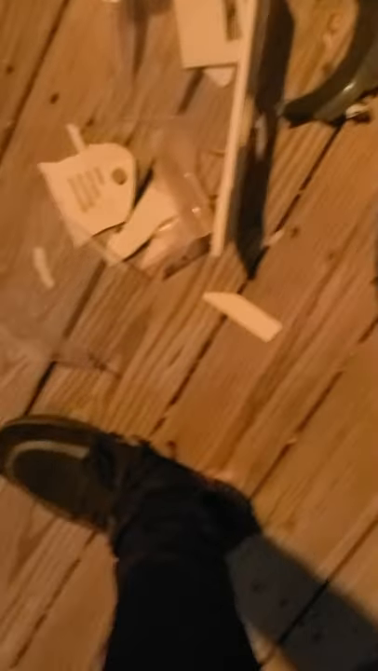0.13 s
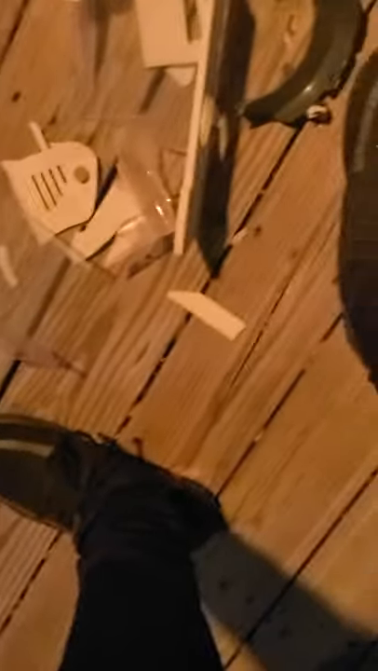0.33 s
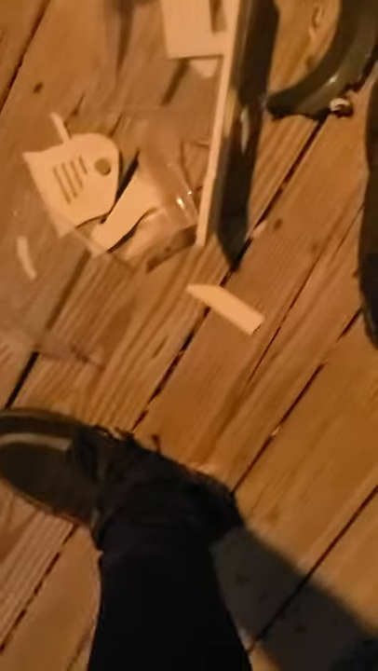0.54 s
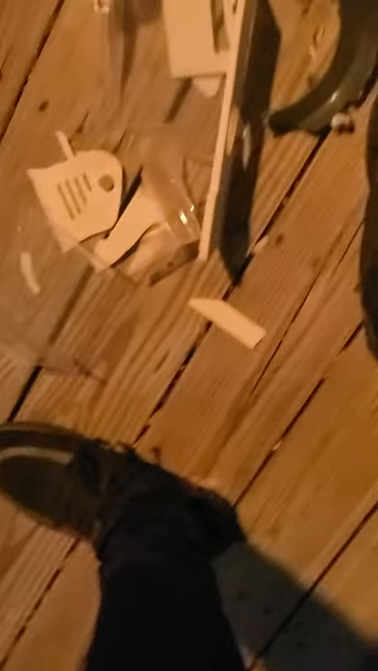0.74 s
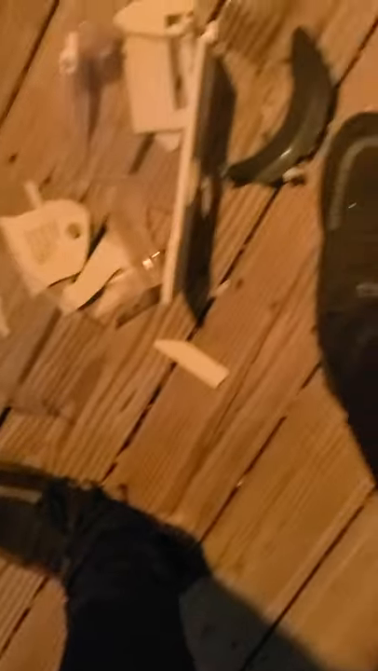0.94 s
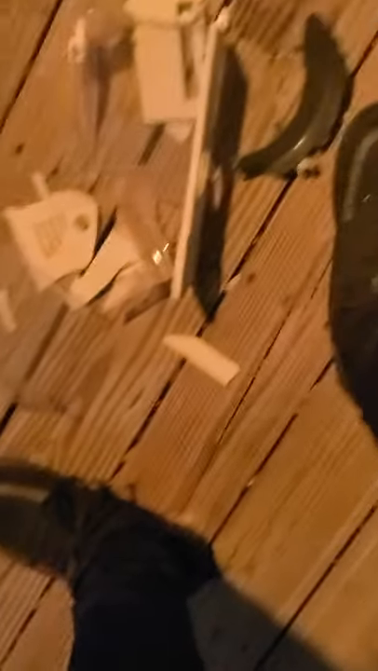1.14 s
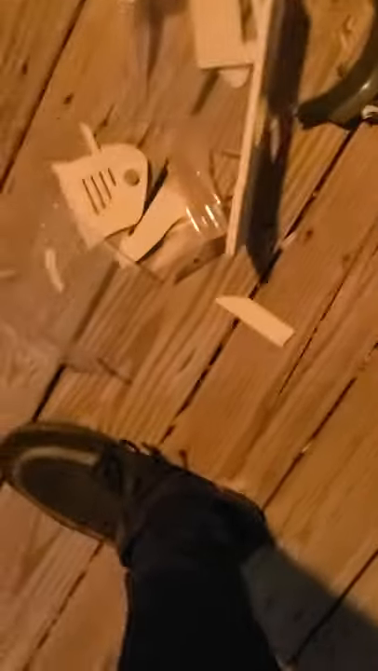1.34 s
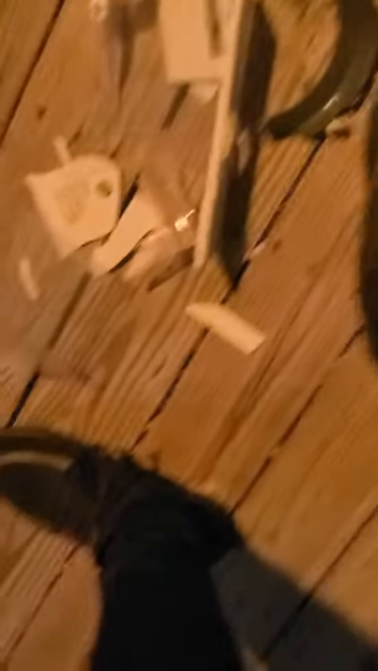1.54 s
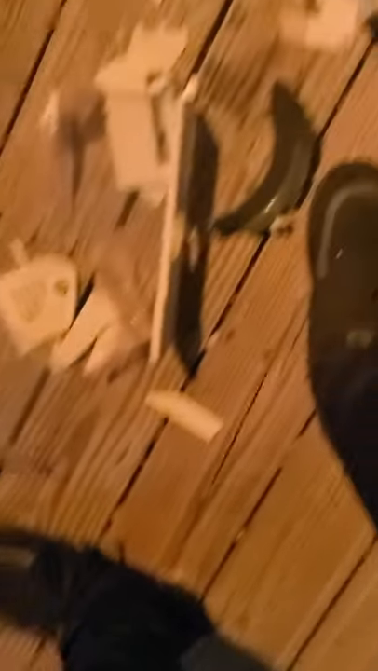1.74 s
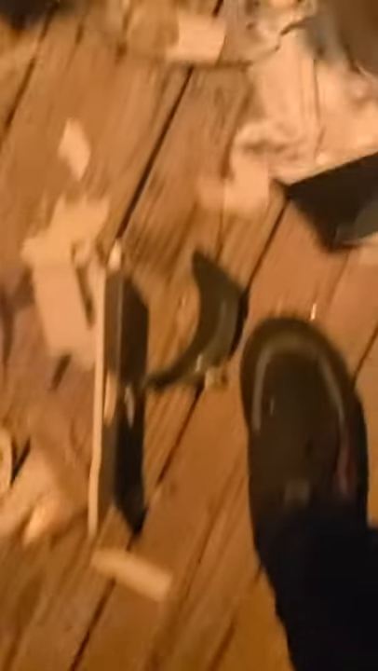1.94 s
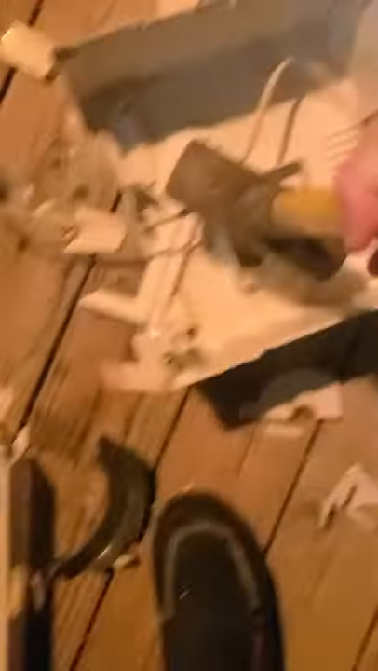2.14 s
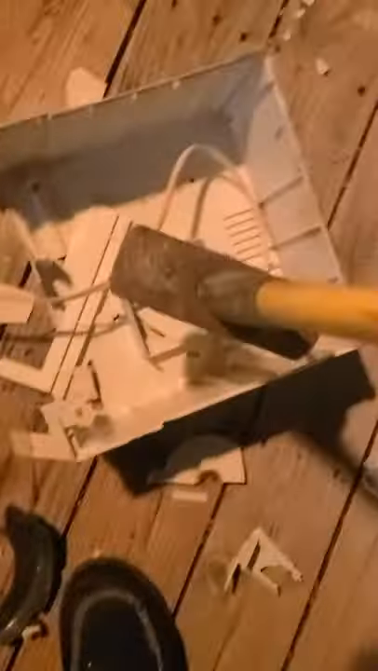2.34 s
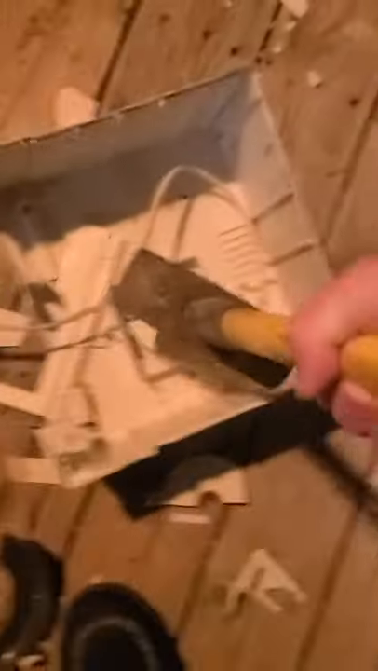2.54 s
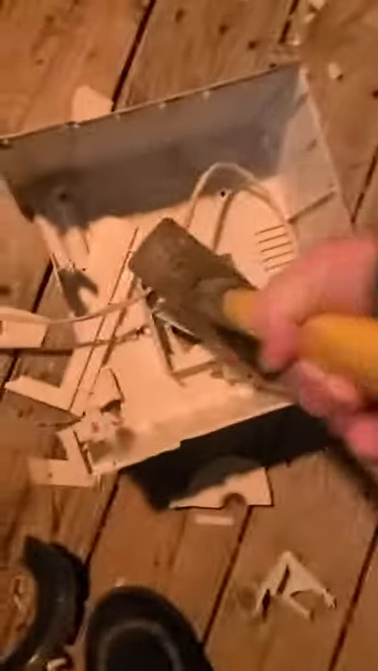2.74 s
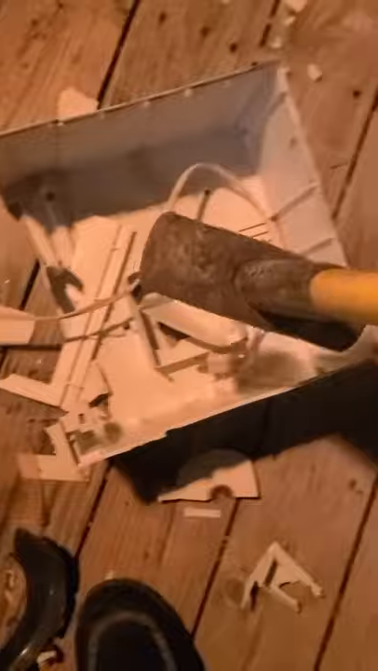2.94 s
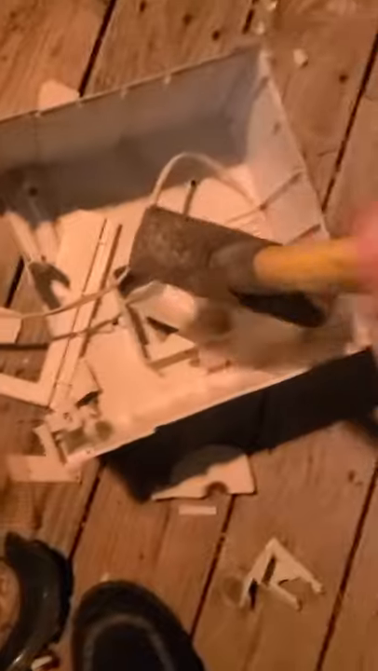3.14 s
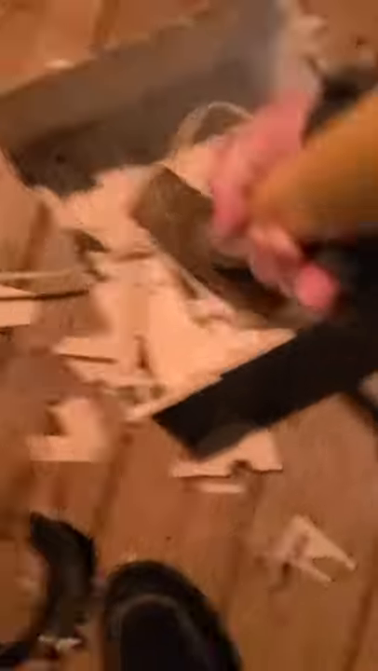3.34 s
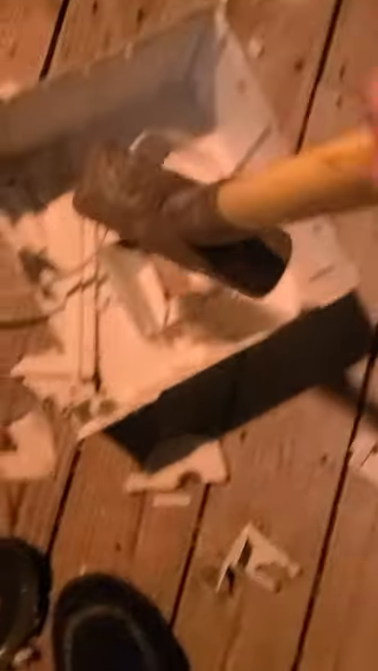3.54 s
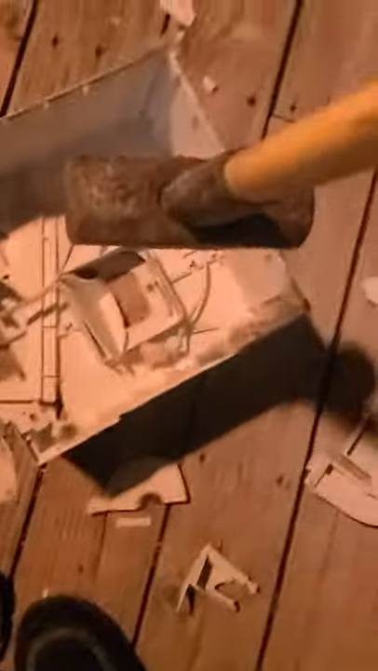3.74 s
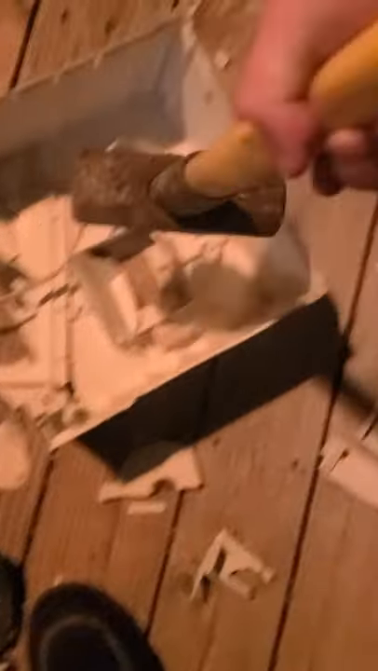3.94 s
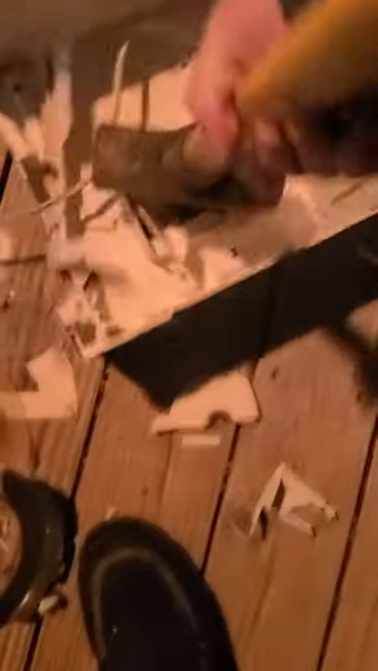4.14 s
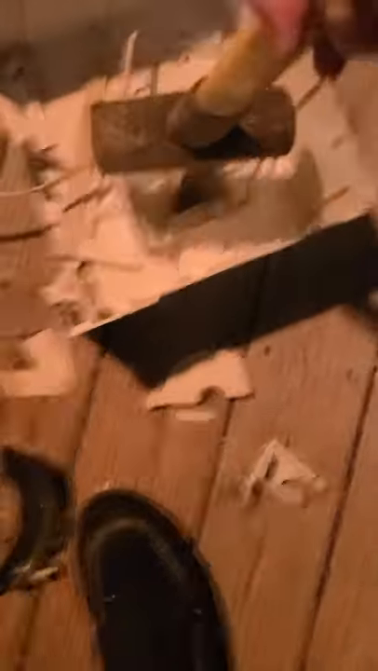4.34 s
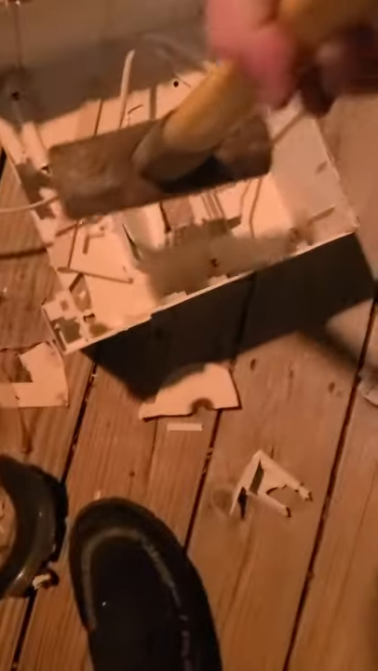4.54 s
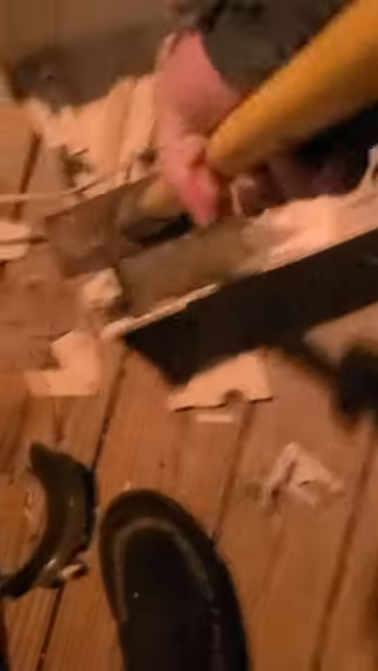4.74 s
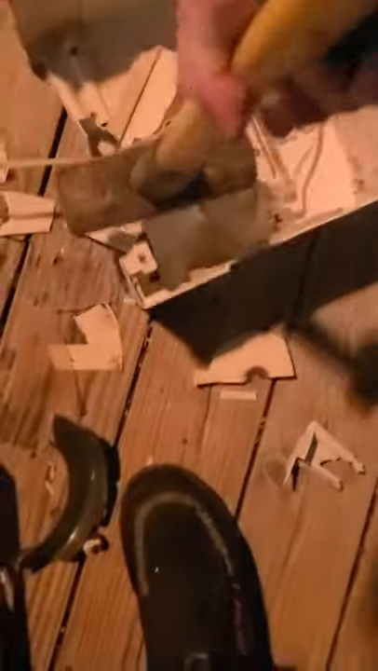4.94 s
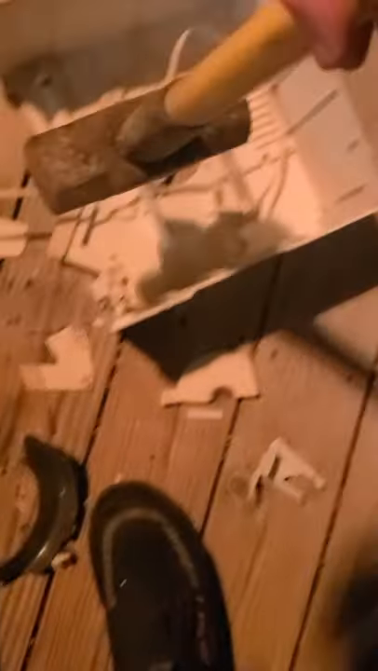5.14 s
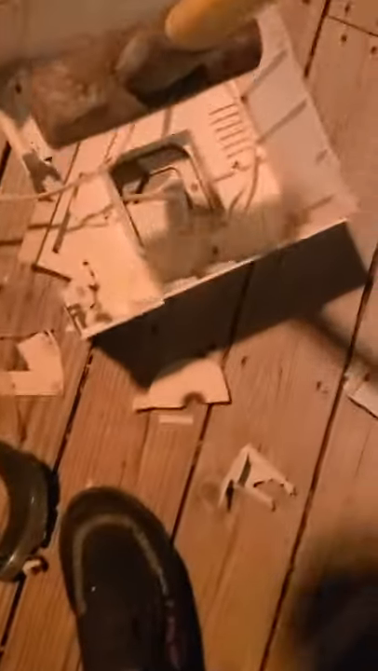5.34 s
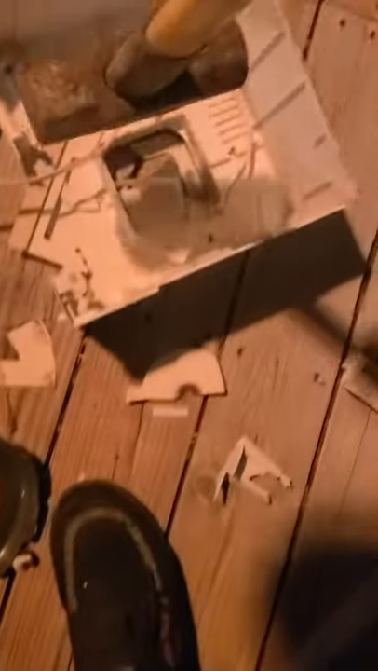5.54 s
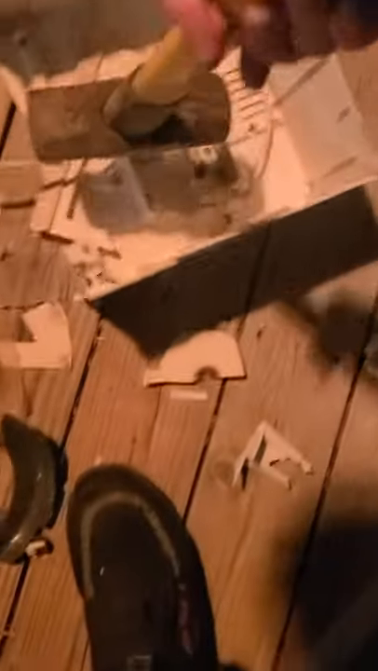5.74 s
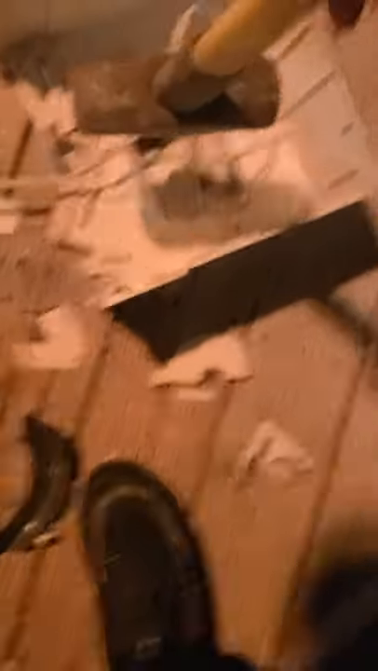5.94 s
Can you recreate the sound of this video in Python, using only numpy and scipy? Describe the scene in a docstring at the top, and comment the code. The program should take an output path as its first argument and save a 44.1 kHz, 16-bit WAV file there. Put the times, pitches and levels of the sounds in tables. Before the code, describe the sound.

Outdoors on a wooden deck, close and dry in stereo, with a very faint low distant rumble. At 0 s a muted thud and small plastic knocks, then light ticks to 0.4 s. At 0.46 s the first heavy hammer blow: bright crack, splinters, hollow boom and deep deck thump, shards rattling away. Small knocks near 0.87 s. A boxier, lighter-bottomed hit comes at 1.28 s with a second crack at 1.36; a harsh crunch follows at 1.97 s, and a crisp hit at 2.61 s. At 3.23 s a loud crack shakes the boards, settling to near quiet. At 4.07 s a very heavy blow bounces with low thuds; at 4.72 s another breaks into a dense cluster of cracks and crunching until about 5.1. After a lull, 5.68 s brings a last hard smash, double low thump and brief debris clatter, fading by 6 s.

```python
"""A sledgehammer batters a broken plastic housing on a wooden deck, outdoors, over a low distant rumble.
From 0 s: a thud and light knocks; then main blows near 0.46, 1.28, 1.97, 2.61, 3.23, 4.07, 4.72 and 5.68 s.
At each blow: noise swells, ringing cracks and ticking splinters, decaying sines for the hollow box and deck.
After each blow: noise-driven modes drum and shake, random grains clatter and grind, then come to rest.
Two microphone ports a little apart hear the housing with reflections and a small lag on the right."""
import sys
import numpy as np
from scipy import signal
from scipy.fft import rfft, irfft, next_fast_len
from scipy.io import wavfile
from scipy.ndimage import uniform_filter1d, map_coordinates

SR = 44100
rng = np.random.default_rng(int(sys.argv[2]) if len(sys.argv) > 2 else 0)


def digitize_waveform(pressure):
    """Quantize a signal to 16-bit integers and store it at the path in sys.argv[1].

    Rows of a 2-D input are taken as channels; values are limited to [-1, 1].
    """
    field = np.atleast_2d(pressure).T
    bounded = np.clip(field, -1, 1)
    quanta = np.round(bounded * 32767).astype(np.int16)
    wavfile.write(sys.argv[1], SR, quanta)


def gain_from_db(level_db):
    """Turn a decibel level (scalar or array-like) into a linear amplitude factor."""
    decades = np.asarray(level_db, float) / 20
    return 10 ** decades


N = 268110

# distant background spectrum: hz, relative level_db (per Hz)
RUMBLE_SPECTRUM = [(15, -42), (25, -21.5), (64, 4.5), (175, -10), (200, -15), (270, -9), (326, -18.5),
                   (1940, -37.5), (2350, -43.5), (5570, -54), (8140, -55.5), (16000, -58)]
# left-right correlation of the background: hz, likeness (-1 to 1)
RUMBLE_LIKENESS = [(60, 1), (240, 1), (950, 0.015), (3770, 0.55), (15000, -0.05)]
RUMBLE_RMS_DB = -48
# faint hiss that comes and goes: start_s, level_db
HISS_LEVEL = [(0, -63), (.8, -82), (1.1, -78), (1.6, -81), (1.9, -70), (2.4, -80), (2.6, -67.5),
              (2.95, -93.5), (3.7, -71.5), (3.8, -94.5), (4.05, -90), (4.5, -71.5), (5.2, -70), (5.65, -75),
              (5.8, -81.5), (6.08, -99)]
# narrow bands in the hiss: band_hz, relative level_db
HISS_BANDS = [(3180, -1.5), (3880, -6.5), (4730, 0), (6130, -6.5), (8130, -4), (9900, -3), (11500, -4.5),
              (13000, -3)]
HISS_BAND_T60_S, HISS_BANDS_RE_HISS_DB = .012, -2

# deck board modes, long span: mode_hz, relative level_db, t60_s
LONG_BOARDS = [(50, -8, 0.27), (69.4, 1, 0.21), (77.54, -7, 0.72)]
# deck board modes, short span: mode_hz, relative level_db, t60_s
SHORT_BOARDS = [(100.4, -6, 0.27), (118.3, -2.5, 0.17), (169, -2.5, 0.21), (204, -7, 0.29)]
# shaking of the deck by each blow: start_s, long_boards_db, long_boards_t60_s, short_boards_db
SHAKES = [(0, -30.5, 1, -36.5), (.46, -20, 1.12, -18), (.868, -46.5, 2, -57), (1.277, -36, 1.1, -26),
          (1.972, -26, 1.27, -24.5), (2.611, -33, 0.88, -30.5), (3.225, -20.5, 1.18, -15),
          (4.069, -17, 1.44, -16.5), (4.716, -19.5, 1.24, -17.5), (5.68, -17.5, 0.84, -24)]
LONG_RISE_S, SHORT_RISE_S, SHORT_T60_S = .022, 0.014, 0.66
# head landing and bouncing on the boards through the housing: start_s, relative level_db, board_hz, t60_s
THUDS = [(0.0, -8.5, 62, 0.074), (0.481, -10, 96.9, 0.14), (0.518, -4, 102, 0.14), (.565, -12, 68, 0.13),
         (.66, -16, 71.9, 0.33), (1.271, -12.5, 171, 0.11), (1.355, -21.5, 75, 0.36),
         (1.762, -26.5, 78, 0.18), (1.985, -13, 254, 0.1), (2.071, -16, 83, 0.19), (2.148, -18, 81, 0.12),
         (2.607, -21.5, 264.5, 0.12), (2.696, -17, 83, 0.16), (2.809, -21, 79, 0.12),
         (3.224, -13.5, 220.6, 0.2), (3.252, -10, 98, 0.13), (3.29, -5.5, 111.1, 0.25),
         (3.448, -14, 70.2, 0.24), (4.097, -1.5, 88, 0.13), (4.151, 3, 107.5, 0.084),
         (4.248, -13.5, 75.3, 0.28), (4.735, -9.5, 85, 0.16), (4.821, -9, 69, 0.14), (5.679, -4, 88.5, 0.1),
         (5.759, 2.5, 77, 0.04), (5.874, -17, 72, 0.2)]

# air modes of the hollow box: mode_hz, relative level_db, t60_s
BOX_MODES = [(245, -3.5, 0.049), (328, -4, 0.05), (371.4, -2.5, .1), (422, -2.5, 0.043), (487.8, -5, 0.053),
             (542, -9.5, 0.048)]
# strikes on the hollow box: start_s, relative level_db, pitch_hz
BOOMS = [(0.035, -33, 370), (0.172, -28, 372), (0.329, -33, 370), (0.449, -21, 423), (0.463, -13, 480),
         (0.49, -9.5, 456), (0.519, -19, 422), (0.62, -37, 318), (0.707, -40, 390), (0.874, -23, 383),
         (1.007, -34, 362), (1.274, -8, 354), (1.285, -5, 382.5), (1.364, -10.5, 350), (1.456, -31.5, 377),
         (1.545, -32.5, 380), (1.971, -12, 375), (1.984, -13, 376), (2.018, -8.5, 534), (2.067, -16, 397),
         (2.106, -24, 365), (2.142, -25, 440), (2.244, -71, 373), (2.612, -9, 257.7), (2.683, -19.5, 424),
         (3.225, -17, 617), (3.25, -14.5, 257), (4.064, -13.5, 393), (4.109, -11.5, 547),
         (4.168, -13.5, 394), (4.201, -11.5, 363), (4.276, -18, 382), (4.374, -34, 355), (4.714, -26, 506),
         (4.723, -6, 356), (4.794, -8.5, 336), (4.848, -6.5, 379.3), (4.879, -9.5, 366), (4.927, -12, 346),
         (5.017, -26, 328), (5.063, -28.5, 396), (5.686, -12, 360), (5.696, -11.5, 420), (5.803, -44, 330),
         (5.87, -36, 354)]
BOX_LAG_S = 0.00026   # the open side of the box faces away from the right port
DRUM_RE_BOOM_DB, DRUM_T60_S = -18, 0.35

# blows and shoves that throw the heap about:
# start_s, heap_db, t60_s (scaled in heap), still_after_s, grinding_re_heap_db
BLOWS = [(0, -36.5, 0.53, 0.11, -31), (.165, -48.5, 0.95, 0.078, -16), (.31, -51, 2.2, .13, -13),
         (0.449, -28.5, 0.79, .33, -12.5), (.864, -45.5, 0.91, 0.27, -21), (1.274, -32, 1.31, 0.26, -9.5),
         (1.968, -24.5, 0.83, .31, -8.5), (2.611, -31, 0.65, 0.26, -6), (3.227, -25.5, 0.61, 0.4, -11),
         (4.068, -23, 0.78, 0.46, -9), (4.718, -27, 1.04, 0.49, -10.5), (5.678, -25, 0.5, 0.48, -15)]
CLATTER_LINGERS, ROCK_LINGERS = 0.87, 1.006   # shares of the heap's t60_s
ROCK_RE_HEAP_DB = 2
STILL_T60_S = 0.27   # extra decay once the shards come to rest
LEAD_IN_RE_HEAP_DB, LEAD_IN_DB_PER_S = -6, 1498.5   # a quick swell of noise up to each blow
CLATTER_RE_CRACK_DB, CLATTER_T60_S = -14, 0.078
CRUNCH_RE_SPLINTER_DB, CRUNCH_T60_S = -10.5, 0.057
SWELL_RE_EVENT_DB, SWELL_T60_S = -26.5, 0.04   # a brief swell of noise before each crack or splinter

# colour of splintering plastic: hz, relative level_db (per Hz)
SNAP_SPECTRUM = [(2060, -27.5), (3500, 1), (3860, -8), (4780, -2), (8020, -7), (8950, -4), (14700, -9),
                 (16000, -20.5), (16500, -31.5)]
# plastic splintering and chips landing: start_s, relative level_db, pitch_hz, left_re_right_db
SPLINTERS = [(0.0034, -20.5, 8900, 1.5), (0.0233, -16, 5000, -2), (0.0686, -33, 4490, 1.0),
             (0.2179, -47.5, 4690, 11), (0.3097, -47.5, 4780, 1.0), (0.3311, -34, 5420, -7),
             (0.366, -44, 5330, 4), (0.413, -50.5, 4500, 2), (0.4457, -24.5, 7420, -5),
             (0.4563, -17, 9400, 4), (0.466, -4.5, 8980, 6.5), (0.475, -11.5, 8910, 3),
             (0.4874, -11.5, 7220, 3), (0.5383, -32.5, 4640, -9), (0.5881, -21, 4800, -4),
             (0.609, -40.5, 5030, 3), (0.6567, -29.5, 10500, 6), (0.6744, -34, 9000, 3),
             (0.7118, -37, 5600, 9), (0.7592, -43, 5350, -2), (0.8612, -64, 5230, 3.5),
             (0.8708, -32.5, 8500, -1.0), (0.9033, -45, 5130, 4), (0.9467, -58, 4910, 1.0),
             (0.9586, -55, 7000, 7), (0.9775, -60, 4550, 0.0), (0.9934, -50, 6790, 3.5),
             (1.0006, -34.5, 5370, 16), (1.051, -49, 4530, -8), (1.279, -7, 5230, 4.5),
             (1.2839, -15, 5330, 4), (1.3421, -29.5, 4700, -2), (1.3543, -25.5, 5560, 4.5),
             (1.362, -17, 7800, 5), (1.3657, -21.5, 4860, -1.0), (1.3884, -27.5, 5700, -10),
             (1.4349, -29, 5030, -5), (1.4588, -32, 5260, -1), (1.9718, -18, 5330, 10.5),
             (1.9825, -10, 6000, 4.5), (2.0005, -4, 5310, -1.5), (2.0195, -19.5, 7060, 11),
             (2.0714, -38, 4400, 4), (2.1011, -36, 7450, -2.5), (2.1246, -34.5, 6800, -6.5),
             (2.151, -17.5, 4540, 1.5), (2.1705, -28.5, 6500, 0), (2.2515, -45.5, 6000, 24),
             (2.2734, -35, 10100, 1.5), (2.3504, -40.5, 8440, -8.5), (2.6128, -7, 4660, 3),
             (2.6186, -10.5, 4600, 3.5), (2.6258, -9, 5030, 2.5), (2.6518, -19.5, 11800, 2),
             (2.703, -26, 6430, 3), (2.7636, -38.5, 4660, -13), (2.7885, -37, 4420, 0.5),
             (2.8227, -37, 6960, 11), (2.8539, -49, 5980, 3), (2.9064, -57.5, 4380, 2),
             (2.9354, -59, 4620, -0.5), (3.2271, -15, 5010, 5), (3.244, -7.5, 6820, 6),
             (3.2566, -5.5, 4940, -2.5), (3.3287, -31, 7640, -11), (3.3618, -32, 4700, 17),
             (3.3867, -68, 5190, 20), (3.4146, -58, 4960, 1.5), (3.4429, -48, 4980, 0.0),
             (3.4552, -47, 5300, 10), (3.4855, -53, 5760, 1.0), (3.5324, -49, 5660, 0.5),
             (3.6644, -58, 6550, 1), (4.0677, -30, 4730, -6), (4.1024, -12.5, 6100, -6),
             (4.1154, -13, 5900, 11), (4.1634, -26.5, 6300, 6), (4.2084, -35.5, 5530, 8.5),
             (4.2694, -14.5, 10500, 9), (4.3421, -40, 4520, 12), (4.377, -32, 5300, 4),
             (4.419, -41, 5160, 9), (4.4424, -40, 5260, 10), (4.454, -50.5, 4800, 5),
             (4.7163, -18, 9400, 7.5), (4.7259, -16.5, 5400, -6), (4.7352, -14, 9500, 6),
             (4.7819, -15, 6000, -5.5), (4.7952, -18.5, 5340, -4), (4.804, -8, 11900, 5.5),
             (4.8274, -8.5, 5850, 3), (4.8494, -14.5, 6240, 4.5), (4.8654, -28, 5800, -0.5),
             (4.8877, -24, 4970, 5.5), (4.9089, -30, 9400, 1.5), (4.9184, -28.5, 11900, -1),
             (4.94, -27, 7600, 5), (4.9504, -32.5, 7800, 0.5), (4.9856, -34, 4950, 7),
             (5.001, -23.5, 5180, 13), (5.035, -30.5, 4770, 1.0), (5.055, -62, 5270, 14),
             (5.0917, -30.5, 9300, 14), (5.1206, -41, 5260, 4), (5.1522, -46, 11550, 5),
             (5.673, -20, 5460, -1), (5.685, -7, 6300, 4.5), (5.7819, -31, 5940, 13),
             (5.834, -40.5, 5540, -11), (5.8835, -53, 4740, 0.0), (5.932, -73, 5150, 4)]
# colour of walls flexing and tearing: hz, relative level_db (per Hz)
TEAR_SPECTRUM = [(320, -36), (550, -0.5), (748, -7.5), (892, -4.5), (974, 3), (1050, -5), (1800, -9.5),
                 (2430, -11.5), (4500, -19), (5850, -44.5), (9900, -120)]
# housing wall modes: mode_hz, relative level_db, t60_s (shortened in clatter)
WALL_MODES = [(754, -7, 0.16), (934, -6.5, 0.0093), (1200, 8, 0.0094), (1493, 9, 0.022),
              (1820, -4.5, 0.054), (1966, 5, 0.036), (2390, -7, 0.049), (2930, 3.5, 0.016),
              (3730, -17, 0.06), (4870, -21, 0.0097), (6070, -7.5, 0.0073)]
# knocks of head, walls and shards: start_s, relative level_db, low_hz, high_hz, high_re_level_db
CRACKS = [(0.003, -25.5, 1670, 2570, -1), (0.025, -34, 956, 2510, 6), (0.058, -33, 930, 3280, 0),
          (0.083, -45, 840, 2540, 4), (0.134, -47.5, 785, 2570, 0.5), (0.17, -29.5, 1310, 2240, -31),
          (0.216, -33, 792, 2360, 4), (0.242, -38, 1350, 2230, -19), (0.31, -40.5, 800, 2400, -6),
          (0.332, -28, 2120, 2480, -0.5), (0.364, -36, 1740, 2380, -3), (0.413, -32.5, 2150, 2570, -3),
          (0.448, -22, 730, 2330, -2), (0.461, -10, 1880, 2940, -0.5), (0.472, -11.5, 1198, 3320, -2.5),
          (0.482, -16, 1274, 2930, -3), (0.538, -23.5, 756, 2930, -7), (0.589, -24, 2100, 2140, -6),
          (0.628, -45, 756, 2650, 7), (0.667, -27.5, 1900, 2320, -13), (0.707, -33.5, 1950, 2340, -3),
          (0.75, -34, 1910, 2400, -3.5), (0.863, -33.5, 2210, 2260, -1), (0.873, -27, 814, 3490, 3.5),
          (0.904, -32, 2190, 2350, -2.5), (0.95, -40, 2270, 2270, -1), (0.955, -40, 724, 3240, 2.5),
          (0.975, -49, 775, 3200, -5), (0.994, -43, 750, 3160, 2), (1.005, -31.5, 1270, 3160, -4),
          (1.054, -36.5, 2140, 3090, 2), (1.075, -33.5, 1265, 3000, -6), (1.276, -23.5, 1010, 3170, 6),
          (1.28, -12, 2040, 2710, -3.5), (1.285, -30, 1680, 3170, 12), (1.35, -15.5, 1065, 2230, -11),
          (1.361, -9, 1218, 2240, -12.5), (1.366, -18, 1800, 2850, -14), (1.423, -39, 1840, 3200, 3),
          (1.434, -28, 1990, 3300, 0), (1.456, -31, 2200, 2210, 2), (1.524, -36, 1820, 3040, -4),
          (1.644, -41.5, 1860, 2300, -11), (1.657, -45, 1930, 2290, -5), (1.767, -43, 877, 2330, -1),
          (1.964, -25.5, 1180, 3070, -7), (1.972, -7, 1294, 2750, -15.5), (1.981, -8, 1234, 3170, -23),
          (1.999, -12.5, 950, 2370, -18), (2.017, -12.5, 990, 2750, -25), (2.072, -21.5, 990, 2320, -26),
          (2.131, -26.5, 1870, 2820, -0.5), (2.155, -19.5, 1290, 2280, -8),
          (2.224, -31.5, 1360, 2900, -2.5), (2.411, -50, 1920, 2950, -10.5),
          (2.61, -7.5, 1390, 2320, -10.5), (2.617, -16.5, 1970, 2940, 6), (2.624, -17.5, 1158, 4190, -23),
          (2.7, -19.5, 2080, 2170, -10), (2.749, -31, 1310, 2840, -10), (2.792, -29, 1440, 2840, -23),
          (2.824, -36.5, 1290, 2210, -1), (2.848, -37, 1200, 2200, -20), (2.907, -41.5, 1950, 2800, -5.5),
          (2.936, -39, 1234, 2670, -2), (2.991, -56, 1370, 2240, -21.5), (3.224, -3, 1820, 2180, -12),
          (3.232, -12, 677, 2250, -23), (3.243, -12.5, 1800, 2220, -22), (3.254, -21, 1240, 2380, -12),
          (3.324, -31.5, 777, 2280, 4), (3.36, -41, 730, 2910, -14), (3.414, -39, 2220, 2240, 3.5),
          (3.442, -44.5, 686, 2900, 12), (3.456, -39, 1210, 2590, -14), (3.481, -39.5, 1440, 2320, -19),
          (3.532, -38, 1330, 2600, -22), (3.571, -51, 1370, 2270, -20), (4.066, -4, 1566, 2100, -8),
          (4.103, -19, 931, 2400, -13), (4.115, -7, 733, 2450, -14), (4.178, -30.5, 750, 4100, -16),
          (4.214, -26, 920, 2550, -20), (4.274, -17.5, 1200, 2666, 4), (4.379, -26, 1200, 3410, -4),
          (4.404, -36, 1150, 2240, -10), (4.443, -34.5, 1680, 2440, -19), (4.462, -37.5, 773, 2390, -24),
          (4.716, -5, 1813, 2250, -20), (4.722, -20, 1620, 2600, -15), (4.731, -6.5, 1820, 2650, -7),
          (4.784, -11.5, 1800, 2620, -19), (4.804, -19, 1870, 3340, -14), (4.832, -7.5, 1020, 2840, -7),
          (4.848, -18, 720, 3060, -7), (4.867, -21, 763, 2560, -9), (4.895, -26, 860, 2850, -19),
          (4.937, -18.5, 960, 2410, -23), (4.98, -23, 940, 2160, -20), (5.003, -25.5, 1830, 3280, -11),
          (5.034, -20, 2020, 2800, -8), (5.091, -33.5, 947, 2760, -18), (5.121, -30, 1950, 2760, 1.5),
          (5.15, -38.5, 1240, 3380, -15), (5.215, -47, 786, 2410, -21), (5.678, -14, 1505, 2200, -20),
          (5.684, -9, 1820, 3130, -8), (5.786, -42, 1930, 3640, -14), (5.804, -34.5, 1860, 2360, -11),
          (5.85, -41, 716, 3580, -8), (5.884, -36, 693, 2840, -9), (5.901, -35.5, 800, 2420, -20),
          (5.935, -36, 773, 4270, -21)]
CRACK_SCATTER_DB = 9.5   # random left-right level spread of the cracks
RATTLE_RE_CLICK_DB, RATTLE_T60_S = -18, 0.097   # a loose piece rattles on

# reflections off the box walls and the deck: left_ms, right_ms, level_db
ECHOES = [(1.1, 1.564, -13), (2.9, 2.3, -12), (4.6, 3.5, -18)]
# extra delay of the right port, shrinking by 2.5 s: start_s, lag_ms
PORT_LAG = [(0, 0.37), (1.5, .35), (2.5, 0.047), (3.2, 0.12), (6.08, .14)]


def rms_one(x):
    """Scale to rms 1."""
    return x / np.sqrt(np.mean(x ** 2) + 1e-20)


def in_time(rows):
    """Columns of a curve interpolated at every sample."""
    start_s, *columns = np.transpose(rows)
    return [np.interp(np.arange(N) / SR, start_s, column) for column in columns]


def at_hz(points, hz):
    """Second column of a table interpolated on a log-frequency axis."""
    point_hz, values = np.array(points).T
    return np.interp(np.log(hz), np.log(point_hz), values)


def fft_hz(size):
    """FFT bin frequencies, held to at least 1 Hz for the log axis."""
    return np.maximum(np.arange(size // 2 + 1) * SR / size, 1)


def band_pass(x, low_hz, high_hz):
    """Second-order Butterworth band-pass."""
    return signal.sosfilt(signal.butter(2, [low_hz, high_hz], "band", fs=SR, output="sos"), x)


def coloured(x, spectrum):
    """Shape by a spectrum; unit white noise keeps rms 1."""
    size = next_fast_len(N)
    gain = gain_from_db(at_hz(spectrum, fft_hz(size)))
    return irfft(rfft(x, size) * rms_one(gain), size)[..., :N]


def evened(x, span_s):
    """Steady shaking of rms 1: chance swells longer than the span are divided out."""
    return x / np.sqrt(uniform_filter1d(x ** 2, int(span_s * SR)) + 1e-12)


def ring(force, hz, t60_s):
    """Damped two-pole resonator: a unit click sets a sine of height 1 ringing."""
    radius = gain_from_db(-60 / (t60_s * SR))
    angle = 2 * np.pi * hz / SR
    return signal.lfilter([0, np.sin(angle)], [1, -2 * radius * np.cos(angle), radius * radius], force + 1e-18)


def clicks(rows, sizes):
    """A one-sample click of each size at the time of each row."""
    out = np.zeros(N)
    index = np.minimum(np.array(rows)[:, 0] * SR, N - 1).astype(int)
    np.add.at(out, index, sizes)
    return out


def grains(per_s, spread_db):
    """Random ticks of uneven size and sign."""
    sizes = gain_from_db(spread_db * np.minimum(rng.exponential(1, N), 4)) * rng.choice([-1, 1], N)
    return sizes * (rng.random(N) < per_s / SR)


def strike(modes, rows, level_db, spread_db):
    """Each contact strikes each mode with a random strength and sign."""
    chance = rng.standard_normal((len(rows), len(modes), 2))
    out = np.zeros(N)
    for k, (hz, mode_db, t60_s) in enumerate(modes):
        strength = gain_from_db(level_db + mode_db + spread_db * chance[:, k, 0])
        out += ring(clicks(rows, strength * np.sign(chance[:, k, 1])), hz, t60_s)
    return out


def own_rings(rows, level_db, hz, t60_s, rise_cycles):
    """Each contact rings one piece: a sine at its pitch that swells and decays."""
    out = np.zeros(N + SR)
    for start_s, db, pitch_hz, decay_s in zip(np.array(rows)[:, 0], level_db, hz, t60_s):
        t = np.arange(int(decay_s * SR)) / SR
        swell = 1 - np.exp(-t * pitch_hz / rise_cycles)
        tone = np.sin(2 * np.pi * pitch_hz * t)
        out[int(start_s * SR):][:len(t)] += gain_from_db(db - 60 * t / decay_s) * swell * tone
    return out[:N]


def aftermath(rows, level_db, t60_s, rise_s):
    """Envelope of the motion each event leaves: a quick swell, then exponential decay."""
    envelope = np.zeros(N + SR)
    decays_s = np.broadcast_to(t60_s, len(rows))
    for start_s, db, decay_s in zip(np.array(rows)[:, 0], level_db, decays_s):
        t = np.arange(int(decay_s * SR) + 1) / SR
        envelope[int(start_s * SR):][:len(t)] += gain_from_db(db - 60 * t / decay_s) * (1 - np.exp(-t / rise_s))
    return envelope[:N]


def build_up(rows, level_db):
    """Envelope of the brief swell of noise before each event: a decay reversed in time."""
    mirrored = N / SR - np.array(rows)[:, :1]
    return aftermath(mirrored, level_db + SWELL_RE_EVENT_DB, SWELL_T60_S, 1 / SR)[::-1]


def heap(lingers):
    """Envelope of the heap's noise per blow: a quick swell up to it, a slow fall, then rest."""
    t = np.arange(N) / SR
    out = []
    for start_s, db, t60_s, still_after_s, _ in BLOWS:
        since_s = t - start_s
        lead_in_db = db + LEAD_IN_RE_HEAP_DB + LEAD_IN_DB_PER_S * since_s
        rest_db = 60 * np.maximum(since_s - still_after_s, 0) / STILL_T60_S
        fall_db = db - 60 * since_s / (t60_s * lingers) - rest_db
        out.append(gain_from_db(np.where(t < start_s, lead_in_db, fall_db)))
    return np.array(out)


def settling():
    """Levels in dB of clatter, crunch, drumming and boards: blows die away, contacts stir things again."""
    _, long_db, long_t60_s, short_db = np.transpose(SHAKES)
    crack_db, splinter_db, boom_db = (np.array(rows)[:, 1] for rows in (CRACKS, SPLINTERS, BOOMS))
    moving = heap(CLATTER_LINGERS)

    clatter_height = moving.sum(axis=0) + build_up(CRACKS, crack_db)
    clatter_height += aftermath(CRACKS, crack_db + CLATTER_RE_CRACK_DB, CLATTER_T60_S, .001)

    crunch_height = gain_from_db(np.array(BLOWS)[:, -1]) @ moving + build_up(SPLINTERS, splinter_db)
    crunch_height += aftermath(SPLINTERS, splinter_db + CRUNCH_RE_SPLINTER_DB, CRUNCH_T60_S, 0.0008)
    crunch_height += gain_from_db(in_time(HISS_LEVEL)[0])

    drum_height = heap(ROCK_LINGERS).sum(axis=0) * gain_from_db(ROCK_RE_HEAP_DB)
    drum_height += aftermath(BOOMS, boom_db + DRUM_RE_BOOM_DB, DRUM_T60_S, 0.0055)

    long_height = aftermath(SHAKES, long_db, long_t60_s, LONG_RISE_S)
    short_height = aftermath(SHAKES, short_db, SHORT_T60_S, SHORT_RISE_S)
    heights = np.array([clatter_height, crunch_height, drum_height, long_height, short_height])
    return 20 * np.log10(heights + 1e-6)


def rumble():
    """Far background: coloured noise, alike at both ports in the bass and partly so near 3.8 kHz."""
    size = next_fast_len(N)
    alike = np.clip(at_hz(RUMBLE_LIKENESS, fft_hz(size)), -1, 1)
    mid, side = rfft(rng.standard_normal((2, size)))
    spectra = np.sqrt(1 + alike) * mid + np.sqrt(1 - alike) * side * [[1], [-1]]
    pair = irfft(spectra, size)[:, :N]
    return gain_from_db(RUMBLE_RMS_DB) * rms_one(coloured(pair, RUMBLE_SPECTRUM))


def hiss_bands():
    """Part of the faint hiss: noise through narrow resonances."""
    noise = rng.standard_normal((2, N))
    bands = sum(gain_from_db(db) * ring(noise, hz, HISS_BAND_T60_S) for hz, db in HISS_BANDS)
    return gain_from_db(in_time(HISS_LEVEL)[0] + HISS_BANDS_RE_HISS_DB) * rms_one(bands)


def boards(modes, span_s):
    """Boards shaken on their joists: noise-driven modes, nearly alike at both ports."""
    shaking = sum(gain_from_db(db) * ring(rng.standard_normal((2, N)), hz, t60_s) for hz, db, t60_s in modes)
    shared, unlike = band_pass(shaking, 40, 260)
    return evened(shared, span_s) + .12 * rms_one(unlike) * [[1], [-1]]


def deck(long_db, short_db):
    """A decaying sine thud under the head; the short boards quieten first, so the boom sinks."""
    _, level_db, hz, t60_s = np.transpose(THUDS)
    thuds = own_rings(THUDS, level_db - 1, hz, t60_s, rise_cycles=0.65)
    long_shake = gain_from_db(long_db) * boards(LONG_BOARDS, 0.028)
    short_shake = gain_from_db(short_db) * boards(SHORT_BOARDS, 0.098)
    return thuds + long_shake + short_shake


def box(drumming_db):
    """The hollow booms when struck and drums on as the housing rocks; louder and later on the right."""
    _, level_db, hz = np.transpose(BOOMS)
    booms = own_rings(BOOMS, level_db, hz, 26.7 / hz, rise_cycles=.6)
    booms = booms + strike(BOX_MODES, BOOMS, level_db - 15, spread_db=4.5)
    driven = (gain_from_db(db) * ring(rng.standard_normal((2, N)), f, t60_s) for f, db, t60_s in BOX_MODES)
    shared, unlike = sum(driven)
    drumming = evened(shared + 0.42 * unlike * [[1], [-1]], 0.057)
    left, right = booms + gain_from_db(drumming_db - 3) * drumming
    late = np.interp(np.arange(N) - BOX_LAG_S * SR, np.arange(N), right)
    return np.array([left, late]) * gain_from_db([[-2.5], [2.0]])


def clatter(clatter_db, crunch_db):
    """Random shard ticks ring the walls and grind on each other, partly unlike at the two ports."""
    knock, grind = [], []
    for _ in range(2):
        ticks = grains(1800, spread_db=1.5)
        dealt = rng.integers(0, len(WALL_MODES), N)   # each tick strikes one wall mode
        body = sum(gain_from_db(db) * ring(ticks * (dealt == k), hz, 0.17 * t60_s)
                   for k, (hz, db, t60_s) in enumerate(WALL_MODES))
        knock.append(rms_one(body) + 0.64 * coloured(rng.standard_normal(N), TEAR_SPECTRUM))
        grit = rms_one(grains(3000, spread_db=6.0)) + 0.17 * rng.standard_normal(N)
        grind.append(coloured(grit, SNAP_SPECTRUM))
    knocks = evened(knock[0] + 0.56 * knock[1] * [[1], [-1]], 0.025)
    grinds = evened(grind[0] + 1.7 * grind[1] * [[1], [-1]], 0.067)
    return gain_from_db(clatter_db) * knocks + gain_from_db(crunch_db - 3.5) * grinds


def splinters():
    """Each splinter is a short clump of very fine ticks with a brief ring of the chip."""
    _, level_db, hz, pan_db = np.transpose(SPLINTERS)
    snap = rms_one(coloured(grains(9000, spread_db=7.5), SNAP_SPECTRUM))
    out = []
    for side in (1, -1):   # left, right
        db = level_db + side * pan_db / 2
        ticks = snap * aftermath(SPLINTERS, db - 5.5, .012, rise_s=0.00031)
        chip = own_rings(SPLINTERS, db - 5.0, hz, np.full(len(db), .014), rise_cycles=4.5)
        out.append(ticks + chip)
    return np.array(out)


def cracks():
    """Wall modes, two rings of the piece, a crisp click with rattle and a tearing noise, randomly panned."""
    _, level_db, low_hz, high_hz, high_db = np.transpose(CRACKS)
    pan_db = CRACK_SCATTER_DB * rng.standard_normal(len(CRACKS))
    tear = coloured(rng.standard_normal(N), TEAR_SPECTRUM)
    crisp = rms_one(band_pass(rng.standard_normal(N), 1600, 5500))
    strengths = rng.standard_normal((len(CRACKS), len(WALL_MODES)))
    out = []
    for side in (1, -1):   # left, right
        db = level_db + side * pan_db / 2
        walls = sum(ring(clicks(CRACKS, gain_from_db(db + mode_db - 17.0) * strengths[:, k]), hz, t60_s)
                    for k, (hz, mode_db, t60_s) in enumerate(WALL_MODES))
        piece = own_rings(CRACKS, db - 4.5, low_hz, 56.0 / low_hz, rise_cycles=1.0)
        edge = own_rings(CRACKS, db + high_db - 1.5, high_hz, 65.0 / high_hz, rise_cycles=1.0)
        click = crisp * aftermath(CRACKS, db + high_db - 3.0, .009, rise_s=0.0002)
        rattle = crisp * aftermath(CRACKS, db + high_db + RATTLE_RE_CLICK_DB, RATTLE_T60_S, rise_s=0.0022)
        tearing = tear * aftermath(CRACKS, db - 12.5, .014, rise_s=0.00029)
        out.append(walls + piece + edge + click + rattle + tearing)
    return np.array(out)


def ports(pair):
    """Each port gains delayed reflections of the other port's sound; the right one hears a little late."""
    out = pair.copy()
    for *lags_ms, db in ECHOES:
        for k, lag_ms in enumerate(lags_ms):
            lag = int(lag_ms * SR / 1000)
            out[k, lag:] += gain_from_db(db) * pair[1 - k, :N - lag]
    late = np.arange(N) - in_time(PORT_LAG)[0] * SR / 1000
    out[1] = map_coordinates(out[1], [late], order=3, mode="nearest")
    return out


def scene():
    """Housing and shards through both ports, the deck and the rumble below."""
    clatter_db, crunch_db, drumming_db, long_db, short_db = settling()
    housing = cracks() + splinters() + hiss_bands()
    housing = housing + clatter(clatter_db, crunch_db) + box(drumming_db)
    return gain_from_db(1.5) * ports(housing) + deck(long_db, short_db) + rumble()


def low_pass(x):
    """Removes everything above the highest recorded frequency."""
    return signal.sosfilt(signal.butter(12, 16610, fs=SR, output="sos"), x)


def record(dry):
    """The microphone drops the deepest bass and clips at full scale; then the top is cut."""
    heard = signal.sosfilt(signal.butter(3, 36, "high", fs=SR, output="sos"), dry)
    clipped = np.clip(heard, -1, 1)
    finished = signal.sosfilt(signal.cheby2(18, 70, 16900, fs=SR, output="sos"), clipped)
    return low_pass(finished)


dry = scene()
out = record(dry)
digitize_waveform(out)
```